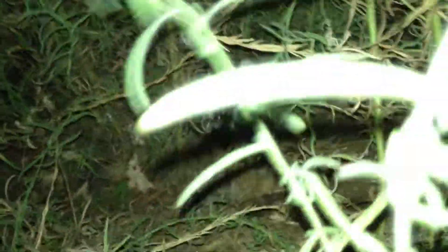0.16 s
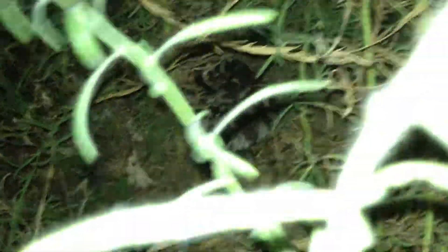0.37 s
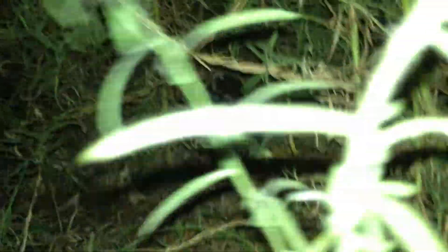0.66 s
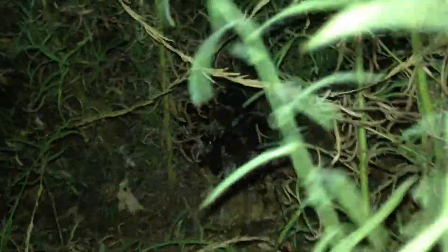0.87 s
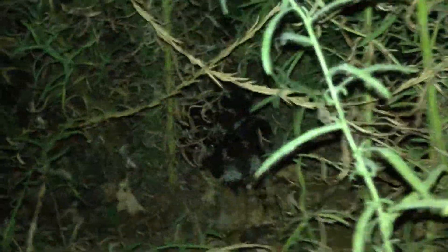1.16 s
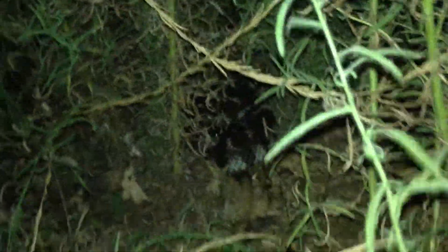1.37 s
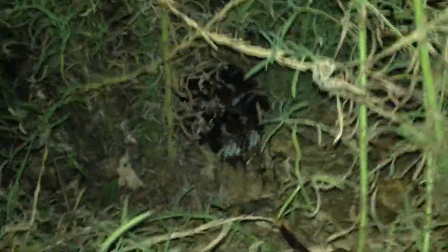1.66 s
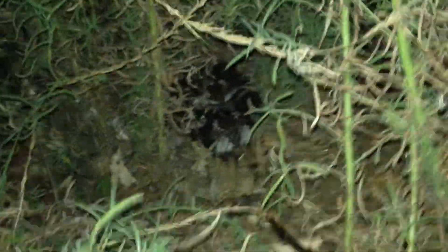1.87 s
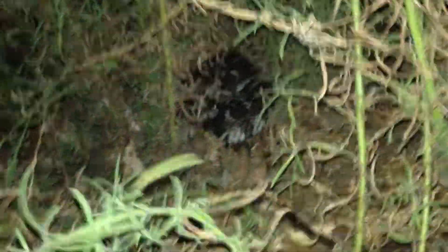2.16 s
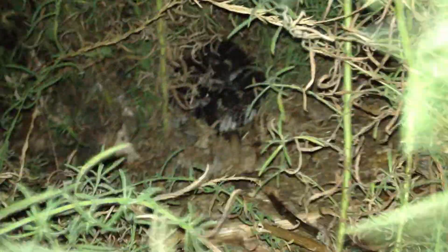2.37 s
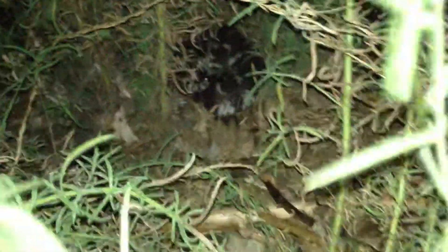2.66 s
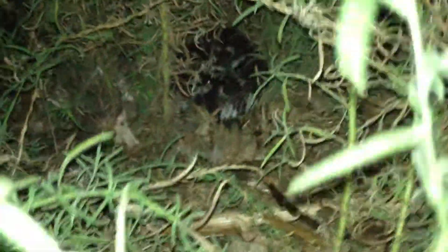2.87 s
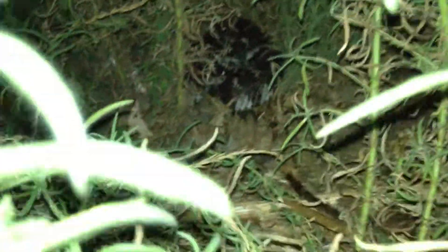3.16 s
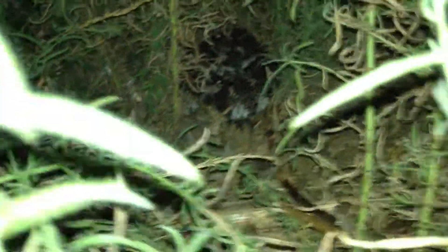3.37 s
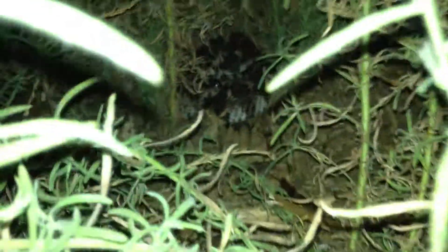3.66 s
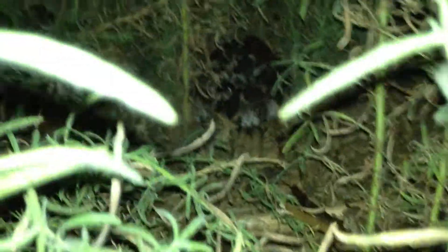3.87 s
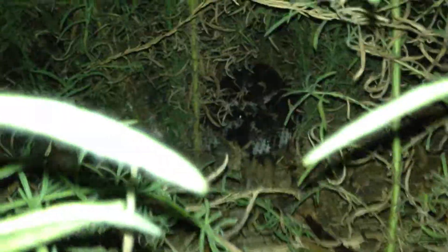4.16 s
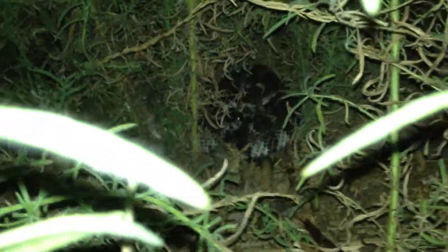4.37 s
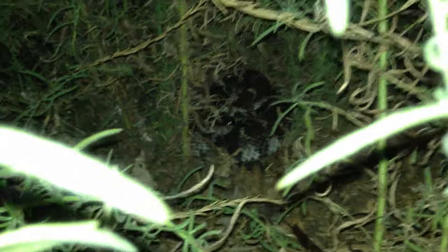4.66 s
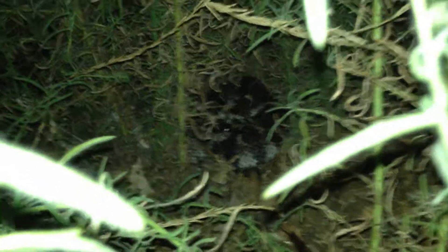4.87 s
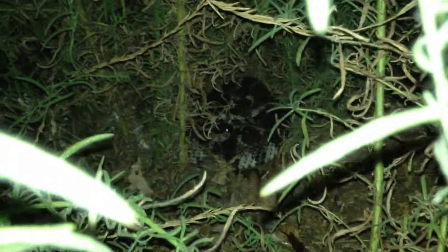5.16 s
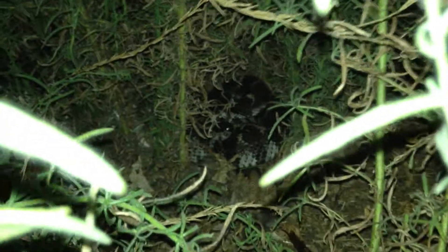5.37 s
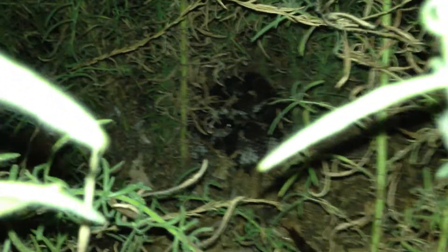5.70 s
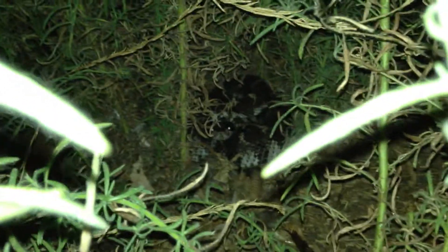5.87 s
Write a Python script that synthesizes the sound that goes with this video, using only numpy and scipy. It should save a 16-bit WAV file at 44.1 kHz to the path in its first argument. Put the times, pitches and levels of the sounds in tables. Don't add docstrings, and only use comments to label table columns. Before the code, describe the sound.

A snake's rattle buzzes continuously as a dry, high sizzling hiss close by at night, with a short burst of snapping dry stalks.

```python
import sys
import numpy as np
from scipy import signal
from scipy.fft import rfft, irfft, next_fast_len
from scipy.io import wavfile
from scipy.ndimage import uniform_filter1d, minimum_filter1d, map_coordinates

SR = 44100
rng = np.random.default_rng(int(sys.argv[2]) if len(sys.argv) > 2 else 0)


def generate_wav(signal):
    frames = np.transpose(np.atleast_2d(signal))
    scaled = np.clip(frames, -1, 1) * 32767
    pcm = np.round(scaled).astype(np.int16)
    wavfile.write(sys.argv[1], SR, pcm)


def rack_gain(trim_db):
    fader = np.asarray(trim_db, float)
    return 10 ** (fader / 20)


N = 265923


def unit(x):
    return x / np.sqrt(np.mean(x ** 2) + 1e-20)


def along(points, hz):
    f, v = np.transpose(points)
    return np.interp(np.log(hz + 1), np.log(f + 1), v)


def curves(rows, t=None):
    if t is None:
        t = np.arange(N) / SR
    s, *cols = np.transpose(rows)
    return [np.interp(t, s, c) for c in cols]


def wobble(rate):
    knots = rng.standard_normal(int(N * rate / SR) + 4)
    return map_coordinates(knots, [np.arange(N) * rate / SR])


def filtered(x, response):
    m = next_fast_len(N + 8192)
    hz = np.fft.rfftfreq(m, 1 / SR)
    return irfft(rfft(x, m) * response(hz), m)[..., :N]


def coloured(x, spectrum):
    return unit(filtered(x, lambda hz: rack_gain(along(spectrum, hz))))


def clicks(count, t60, scatter_db, size=64):
    when, pitch, phase, chance = rng.random((count, 4)).T
    t = np.arange(size) / SR
    strength = rack_gain(-scatter_db * np.log(1 - chance))
    cycles = pitch[:, None] * SR / 2.6 * t + phase[:, None]
    ring = np.sin(2 * np.pi * cycles) * rack_gain(-60 * t / t60)
    where = (when * N).astype(int)[:, None] + np.arange(size)
    total = np.bincount(where.ravel(), (strength[:, None] * ring).ravel(), N + size)
    return unit(total[:N])


# time in seconds, swings per second,
# lopsidedness from 0 to 1, bunching of clacks at the swing ends from 0 to 1.
TAIL_SWINGS = [(0.0, 59.9, 0.14, 0.18), (0.3, 59.9, 0.1, 0.19), (0.6, 59.5, 0.11, 0.27),
               (0.9, 59.2, 0.1, 0.22), (1.2, 59.2, 0.1, 0.26), (1.5, 59.9, 0.15, 0.22),
               (1.8, 60.5, 0.13, 0.1), (2.1, 61.6, 0.18, 0.17), (2.4, 60.8, 0.07, 0.17),
               (2.7, 60.8, 0.09, 0.13), (3.0, 59.4, 0.07, 0.26), (3.3, 59.5, 0.08, 0.22),
               (3.6, 61.9, 0.22, 0.06), (3.9, 62.4, 0.19, 0.09), (4.2, 61.5, 0.21, 0.1),
               (4.5, 60.1, 0.14, 0.2), (4.8, 60.0, 0.13, 0.21), (5.1, 59.0, 0.1, 0.29),
               (5.4, 58.8, 0.16, 0.17), (5.7, 58.9, 0.09, 0.32), (6.0, 60.0, 0.14, 0.2)]
# frequency in Hz, strength in dB per Hz.
SHELL_RING = [(880, -48), (1500, -30.5), (1820, -24.5), (2530, -11), (3190, -5), (3690, 1), (4480, -8.5),
              (5880, -0.5), (7000, 0), (7400, -1.5), (8000, -7), (9400, -9.5), (11800, 0.5), (15200, -5)]
# time in seconds, level in dB.
RATTLE_LEVEL = [(0.0, -31.5), (0.72, -30.5), (1.23, -31), (2.27, -31), (2.82, -31.5), (6.03, -31)]
# time in seconds, low shell ring in dB,
# middle shell ring in dB, tilt of the middle ring in dB per octave.
FACING_PHONE = [(0, 0, 0.5, -1), (.4, -1, -1, -2), (.8, -0.5, -0.5, 0), (1.2, -1, 0, 3),
                (1.6, -0.5, -1.5, 0), (2, -1.5, -0.5, 1), (2.4, -0.5, -1.5, -1), (2.8, -1, -1, -2),
                (3.2, -0.5, -1, -3), (3.6, -0.5, 0.5, 3), (4, -1, 0, 1.5), (4.4, -0.5, .5, 2),
                (4.8, -1, 0, 2.5), (5.2, -1, .5, 2), (5.6, -0.5, 1, 3), (6.03, -1, 0, 4)]
# time in seconds, frequency in Hz, depth in dB.
GROUND_ECHO_DIP = [(0.0, 8230, -1), (0.3, 8500, -7), (0.6, 8530, -6), (0.9, 8360, -4), (1.2, 8300, -9),
                   (1.5, 8200, -10.5), (1.8, 8400, -7), (2.1, 8270, -9), (2.4, 8300, -6.5), (2.7, 8230, -9),
                   (3.0, 8000, -7), (3.3, 7900, -9), (3.6, 7770, -10), (3.9, 7850, -10), (4.2, 7800, -8),
                   (4.5, 7800, -6), (4.8, 8130, -8), (5.1, 8050, -7), (5.4, 7900, -8), (5.7, 7900, -7),
                   (6.0, 8150, -8)]


def rattle():
    swings, lopsided, bunching = curves(TAIL_SWINGS)
    turn = 2 * np.pi * np.cumsum(swings) / SR + 0.17 * wobble(8.6)
    one_side = 1.1 * lopsided * np.cos(turn + 0.6)
    both_ends = 1.1 * bunching * np.cos(2 * turn)
    power = 1 + one_side + both_ends
    clatter = sum(clicks(count=70000, t60=t60, scatter_db=0) for t60 in (0.001, 0.002, 0.004))
    uneven_db = 0.56 * wobble(400) + 0.32 * wobble(90) + 0.12 * wobble(7)
    clatter = clatter * np.sqrt(power) * rack_gain(uneven_db)

    hz, t, z = signal.stft(coloured(clatter, SHELL_RING), SR, nperseg=256)
    hz = hz[:, None]
    level_db, = curves(RATTLE_LEVEL, t)
    low_db, middle_db, tilt_db = curves(FACING_PHONE, t)
    dip_hz, depth_db = curves(GROUND_ECHO_DIP, t)
    middle_db = middle_db + tilt_db * np.log2(hz / 6300 + 1e-3)
    low = hz < 4450
    middle = (hz >= 4450) & (hz < dip_hz)
    turning_db = low_db * low + middle_db * middle
    dip_width_hz = np.where(hz < dip_hz, 300, 500)
    dip_db = 0.86 * depth_db * np.exp(-((hz - dip_hz) / dip_width_hz) ** 2)
    shaped = z * rack_gain(level_db + 3.0 + turning_db + dip_db)
    return signal.istft(shaped, SR, nperseg=256)[1][:N]


# time in seconds, peak in dB, ring in Hz,
# crack in dB, push of air in dB, length in seconds.
STALK_SNAPS = [(1.804, -22, 12900, -15, -28, .003), (1.8106, -16, 13400, -17, -32, .0015),
               (1.933, -20.5, 12900, -4, -17, .002), (2.018, -22, 14300, -14, -28, .003),
               (2.0323, -15.5, 6500, -6, -23, 0.0044), (2.1443, -21, 11500, -12, -28, .002),
               (2.162, -4.5, 14300, -15.5, -25, 0.0017), (2.174, -25, 6160, -14, -26, .004),
               (2.2935, -22, 12100, -12, -30, .003), (2.307, -20, 12600, -9, -30, .002),
               (2.313, -21, 7740, -10, -28, .004), (2.334, -14, 12000, -10, -32, .002),
               (2.3435, -21, 11900, -8, -32, .002), (2.3472, -17.5, 12400, -7, -28, 0.0032)]
# time in seconds, level in dB.
RUB_LEVEL = [(1.72, -56), (1.8, -41), (1.87, -45), (1.96, -50), (2.02, -33), (2.08, -48), (2.15, -36),
             (2.22, -47), (2.27, -38), (2.3, -38), (2.318, -43), (2.328, -37), (2.348, -36), (2.365, -33),
             (2.4, -36), (2.46, -58)]
# frequency in Hz, strength in dB per Hz.
RUB_TONE = [(300, -30), (1500, -13), (3000, -8), (6000, 8), (8500, 3), (12000, 0), (15500, 2)]


def stalks():
    out = np.zeros(N + SR)
    t = np.arange(SR // 20) / SR
    for s, db, hz, crack_db, push_db, length in STALK_SNAPS:
        noise = rng.standard_normal((2, len(t) + 1))
        age = t / length * 3
        swell = age * np.exp(1 - age ** 1.5)
        ring = np.sin(2 * np.pi * hz * t + 0.17 * np.cumsum(noise[0, 1:])) * swell
        splinters = noise[1, 1:] - 0.69 * noise[1, :-1]
        crack = splinters * rack_gain(crack_db) * np.exp(-(t / 0.0035) ** 2)
        puff = t / 0.0001 * np.exp(1 - t / 0.0001)
        thud = 0.083 * np.sin(2 * np.pi * 330 * t) * rack_gain(-60 * t / 0.035)
        snap = ring + crack + rack_gain(push_db) * (puff + thud)
        out[round(s * SR):][:len(t)] += rack_gain(db) * snap
    rub_db, = curves([(0, -120)] + RUB_LEVEL + [(6.03, -120)])
    snaps = filtered(out[:N], lambda hz: (1j * hz / (1j * hz + 200)) ** 2)
    crackle = coloured(clicks(count=30000, t60=0.002, scatter_db=2.0), RUB_TONE)
    return snaps + rack_gain(rub_db) * crackle


# time in seconds, peak in dB, pitch in Hz, time to fade by 60 dB in seconds.
CASE_KNOCKS = [
    (0.254, -46, 234, 0.12),
    (.83, -54, 1400, .12),
    (.865, -50, 1460, .08),
    (1.068, -51, 990, .03),
    (2.983, -39, 850, .008),
    (2.984, -42, 450, .014),
    (2.985, -41, 1400, .008),
    (3.097, -38, 820, 0.014),
    (3.8, -50, 1400, .02),
    (4.065, -47, 1150, .02),
]


def case():
    out = np.zeros(N + SR)
    t = np.arange(SR // 10) / SR
    for s, db, hz, t60 in CASE_KNOCKS:
        wander = 0.03 * np.cumsum(rng.standard_normal(len(t)))
        ring = np.sin(2 * np.pi * hz * t + wander)
        onset = 1 - np.exp(-t / 0.0005)
        out[round(s * SR):][:len(t)] += rack_gain(db + 2 - 60 * t / t60) * ring * onset
    return out[:N]


# time in seconds, hum in dB, air in dB.
NIGHT_LEVEL = [(0.0, -61, -58.5), (0.48, -57.5, -61.5), (0.69, -60.5, -61.5), (0.89, -60, -60),
               (1.16, -61, -61.5), (1.44, -62, -61), (2.05, -60, -60.5), (2.2, -59, -58.5), (2.4, -62, -61),
               (2.62, -60, -63.5), (2.89, -60, -62.5), (3.71, -60.5, -61.5), (3.88, -61, -63),
               (5.07, -59, -63), (5.61, -61.5, -62), (6.03, -60, -63)]
# frequency in Hz, strength in dB per Hz.
HUM_TONE = [(15, -64), (25, -37), (43, -19), (75, -12), (94, -3), (119, 0.5), (202, 0), (265, -4.5),
            (348, -7.5), (382, -12.5), (420, -9.5), (550, -21), (920, -120)]
# pitch in Hz, width in Hz, level in dB.
FAR_DRONES = [
    (112.4, 7.9, -75.5),
    (129, 5.7, -70.5),
    (199.2, 6, -71.5),
]
# frequency in Hz, strength in dB per Hz.
AIR_TONE = [(150, -35), (300, -4), (600, -5.5), (1100, -4), (1800, -5), (3000, -5), (5000, -52)]


def night():
    hum_db, air_db = curves(NIGHT_LEVEL)
    hum = rack_gain(0.7 * wobble(2.87)) * coloured(rng.standard_normal(N), HUM_TONE)
    for centre_hz, width_hz, db in FAR_DRONES:
        narrow = filtered(rng.standard_normal(N), lambda hz: np.exp(-((hz - centre_hz) / width_hz) ** 2))
        hum = hum + rack_gain(db + 61) * unit(narrow)
    air_db = air_db + 4.0 + 1.0 * wobble(8)
    return rack_gain(hum_db) * hum + rack_gain(air_db) * coloured(rng.standard_normal(N), AIR_TONE)


def scene():
    mono = rattle() + stalks() + case() + night()
    return np.tile(mono, (2, 1))


# frequency in Hz, width in Hz, boost or cut in dB.
PORT_COLOUR = [(3250, 150, -2), (4200, 130, 3), (4430, 100, -4.5), (13600, 350, -3.5), (14700, 500, 1)]


def phone(x, margin_db, high_db):
    def port(hz):
        colour_db = sum(db * np.exp(-((hz - c) / w) ** 2) for c, w, db in PORT_COLOUR)
        no_rumble = (1j * hz / (1j * hz + 60)) ** 2
        return rack_gain(colour_db) * no_rumble * (hz < 15290)

    hz, t, z = signal.stft(filtered(x, port), SR, window="cosine", nperseg=2048)
    hz = hz[:, None]
    power = np.abs(z) ** 2
    cell = uniform_filter1d(power, size=8, axis=0)
    masker = uniform_filter1d(power, size=220, axis=0)
    threshold = masker * rack_gain(2 * margin_db + 2 * high_db * (hz > 12500))
    dropped = (cell < threshold) & (hz > 3500)
    kept = minimum_filter1d(1. - dropped, size=4, axis=0)
    return signal.istft(z * kept, SR, window="cosine", nperseg=2048)[1][:N]


# start in seconds, end in seconds,
# lowest Hz, highest Hz, level in dB.
SIDE_SLIP = (3.789, 3.835, 9900, 12000, -32)


def side_slip():
    start, end, low_hz, high_hz, db = SIDE_SLIP
    progress = np.clip((np.arange(N) / SR - start) / (end - start), 0, 1)
    swell = np.sin(np.pi * progress) ** 2
    puff = filtered(rng.standard_normal(N) * swell, lambda hz: (hz > low_hz) & (hz < high_hz))
    return puff * rack_gain(db) * np.array([[1], [-1]])


def low_pass(x):
    return signal.sosfilt(signal.butter(12, 16630, fs=SR, output="sos"), x)


def record(dry):
    mono = phone(dry.mean(axis=0), margin_db=-10.5, high_db=3)
    return low_pass(mono + side_slip())


dry = scene()
out = record(dry)
generate_wav(out)
```